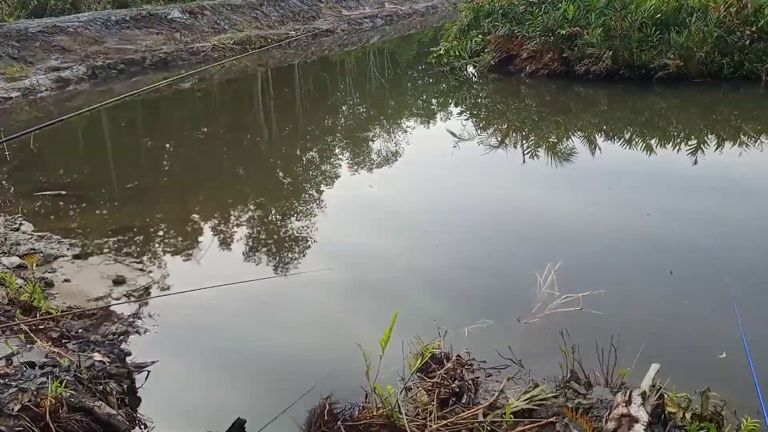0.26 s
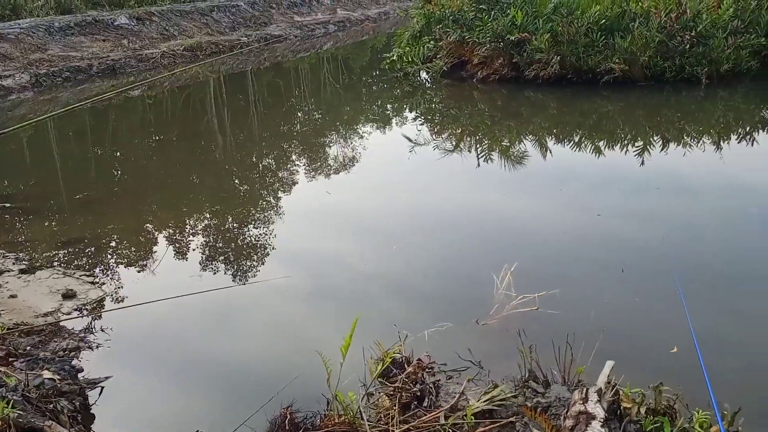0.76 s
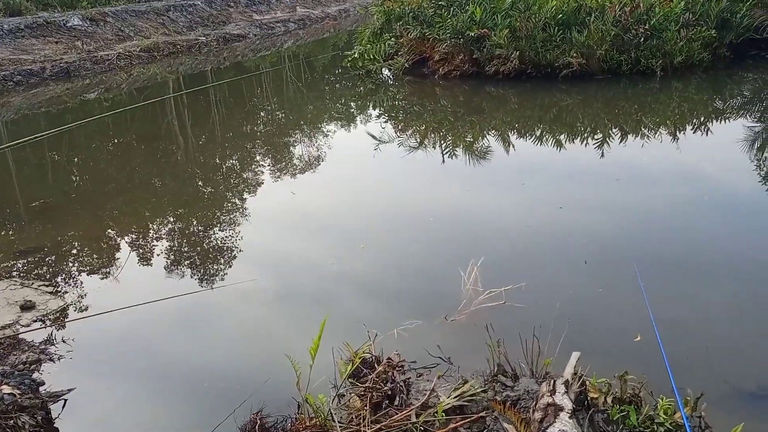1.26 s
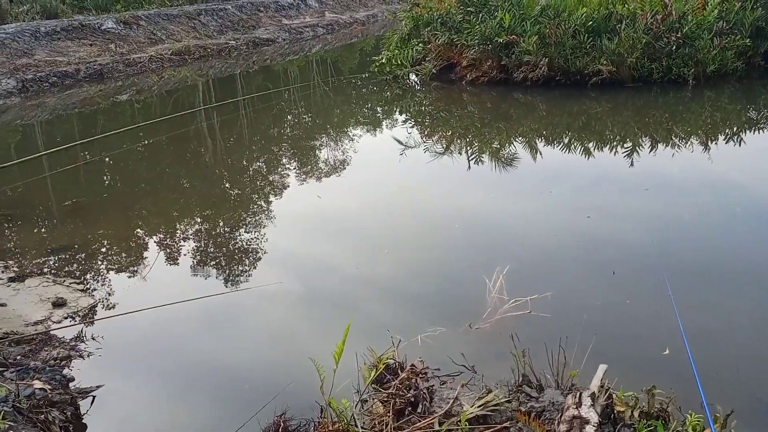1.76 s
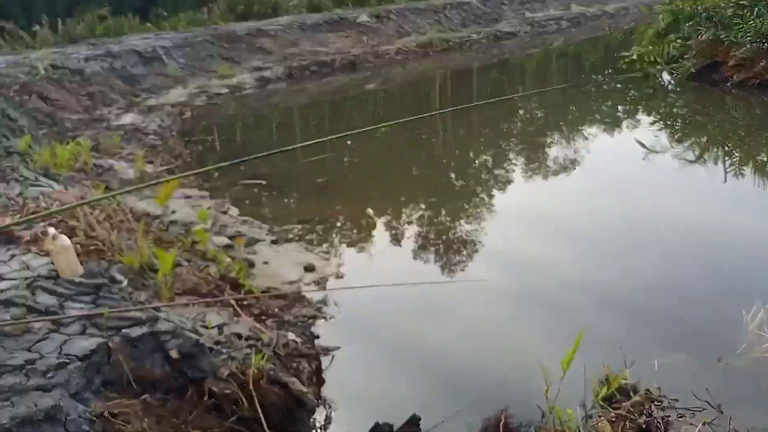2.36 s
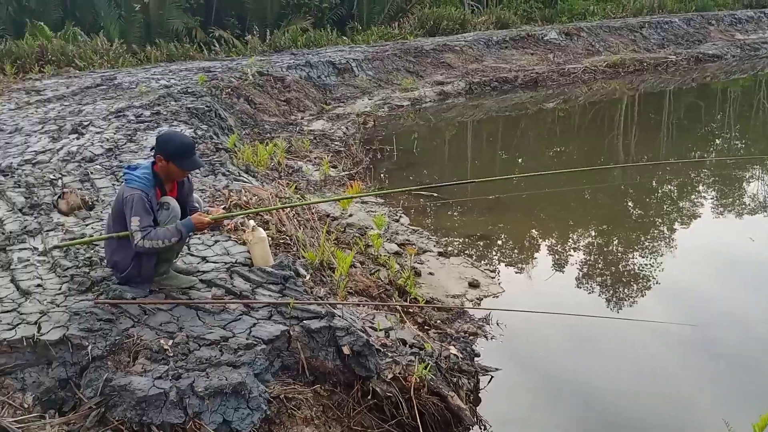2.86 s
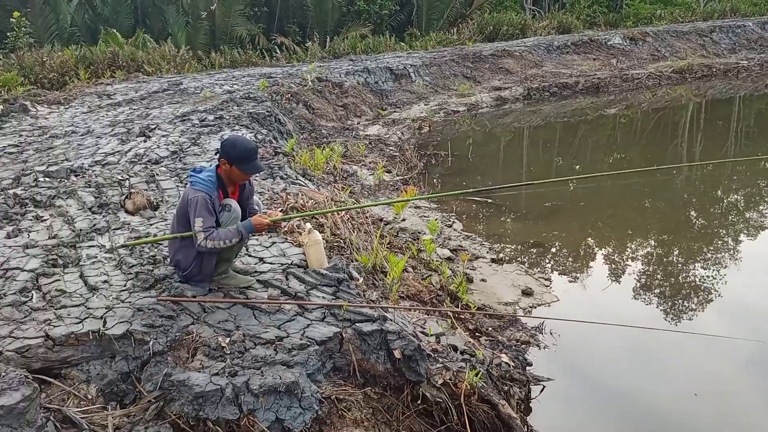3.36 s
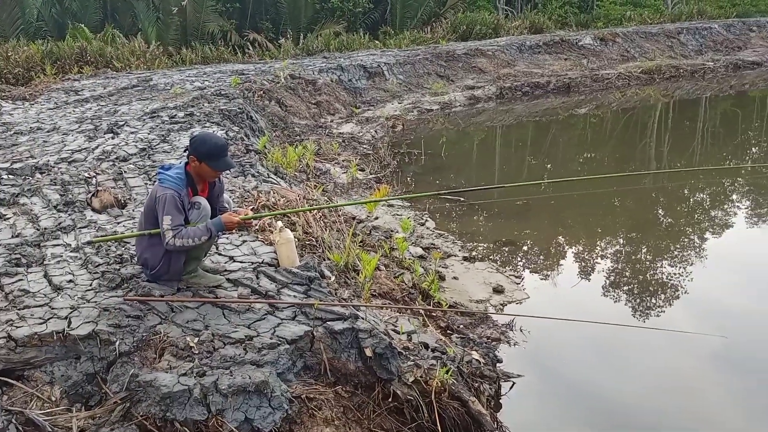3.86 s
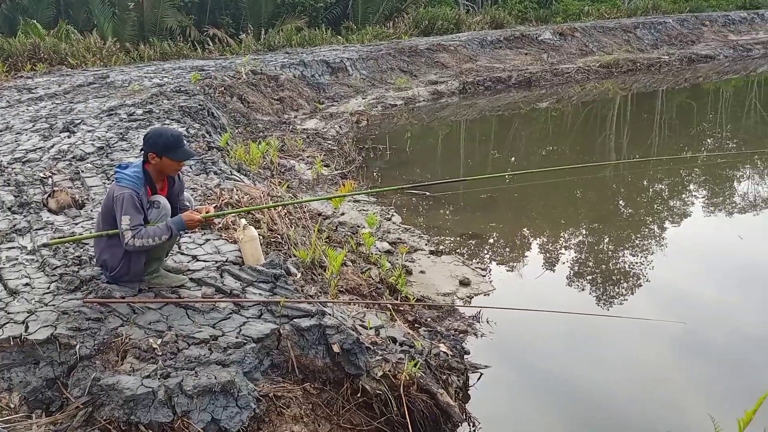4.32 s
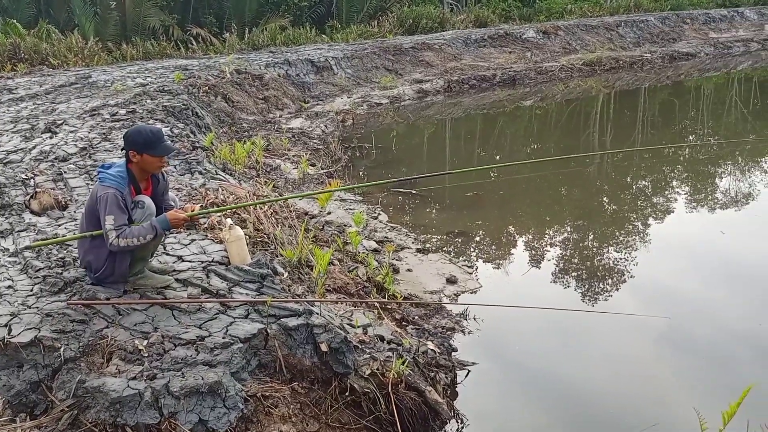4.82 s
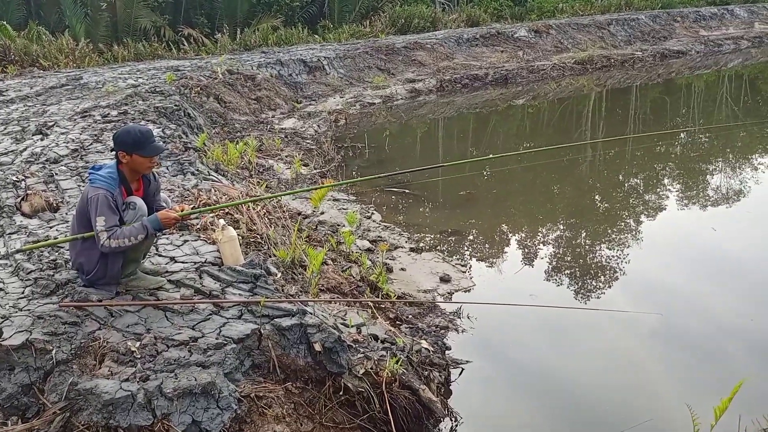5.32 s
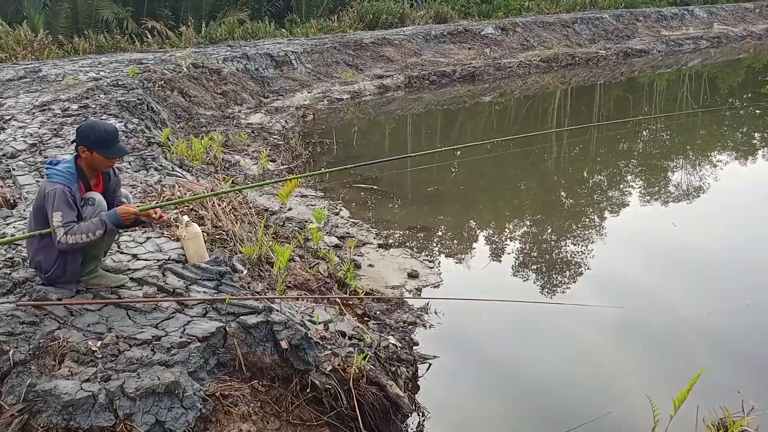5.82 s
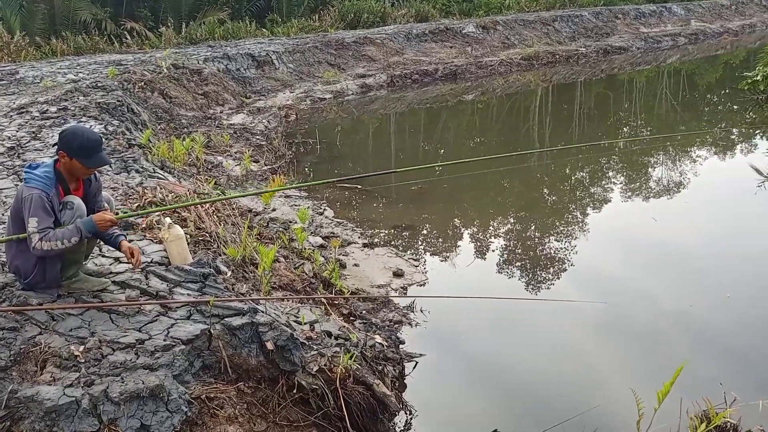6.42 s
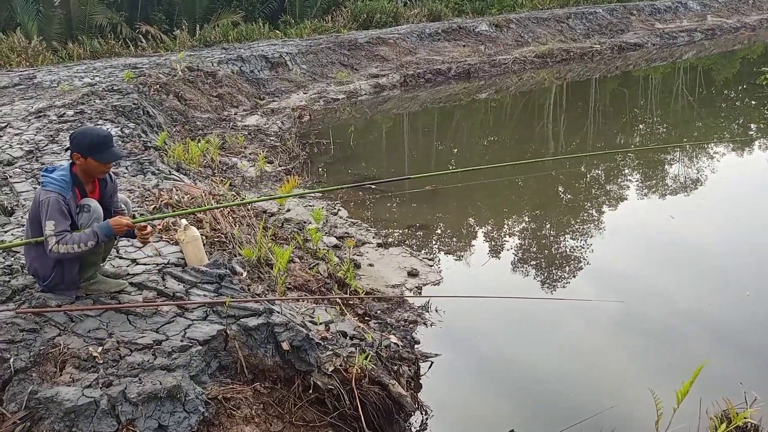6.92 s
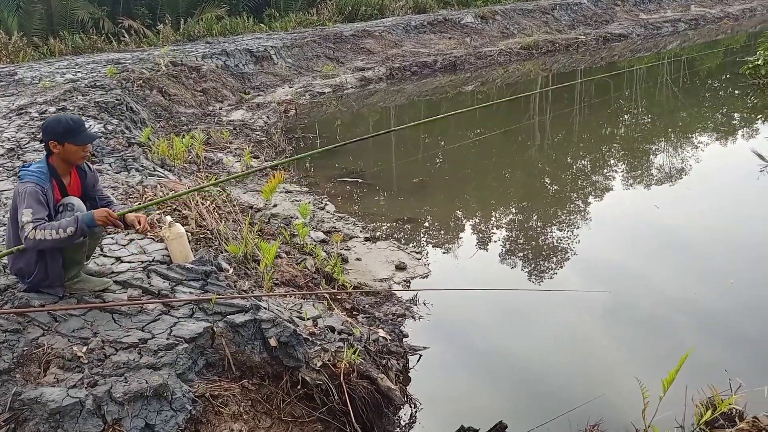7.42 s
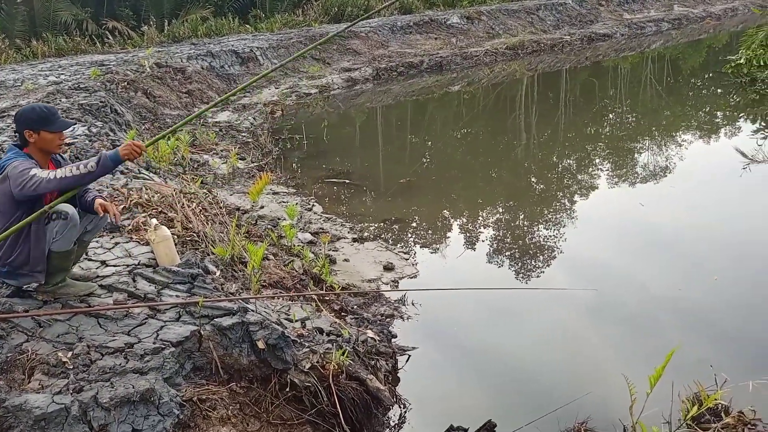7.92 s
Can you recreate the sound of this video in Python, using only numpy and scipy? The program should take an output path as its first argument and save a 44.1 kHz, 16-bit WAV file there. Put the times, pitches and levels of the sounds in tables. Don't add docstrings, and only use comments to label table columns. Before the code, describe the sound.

A calm open-air pond with a low, soft hush. Far crickets make an unbroken trill near 3 kHz, a nearer one buzzes in phrases of roughly half a second to a second, and cicadas ring thinly around 8 kHz, swelling gently. Two dull rod knocks land close at 0.35 and 0.43 s, with a narrow dry tick at 0.6. From 1.1 to 3.8 s a bird chirps about four times a second, each chirp a fast double up-and-down swoop, strongest near 2.5. Firmer thumps cluster at 2.1 and 2.55; faint far whistles bend upward between 2.8 and 3.8, and a bright twig crack comes at 3.5. Insects alone hold from 4 to 5.9 s. The bird then resumes, louder, until the end, lightly echoing. Soft knocks fall at 6.55, a stronger one at 7.15, then a heavy thump at 8.0 and a rapid, muffled flurry to about 8.2.

```python
import sys
import numpy as np
from scipy import signal
from scipy.io import wavfile
from scipy.ndimage import uniform_filter1d

SR = 44100
rng = np.random.default_rng(int(sys.argv[2]) if len(sys.argv) > 2 else 0)


def elevation(decibels):
    levels = np.asarray(decibels, float)
    return 10 ** (levels / 20)


def unload_audio(sound):
    columns = np.transpose(np.atleast_2d(sound))
    steps = np.round(np.clip(columns, -1, 1) * 32767)
    wavfile.write(sys.argv[1], SR, steps.astype(np.int16))


N = 360738


def read(points, hz):
    f, value = np.transpose(points)
    return np.interp(np.log(hz + 1), np.log(f + 1), value)


def evened(x):
    return x / np.sqrt(np.mean(x ** 2) + 1e-20)


def add(mix, s, sound):
    at = round(s * SR)
    sound = sound[max(-at, 0):]
    part = mix[max(at, 0):][:len(sound)]
    part += sound[:len(part)]


def played(source, rows):
    mix = np.zeros(N)
    for row in rows:
        add(mix, *source(*row))
    return mix


def band(x, low_hz, high_hz):
    sos = signal.butter(2, [low_hz, min(high_hz, SR / 2.1)], "band", fs=SR, output="sos")
    return signal.sosfilt(sos, x)


def wander(size, span_s):
    width = max(int(span_s * SR), 1)
    smooth = uniform_filter1d(rng.standard_normal(size), width)
    return evened(uniform_filter1d(smooth, width))


# time_s, level_db
CHORUS_LEVEL = [(0.0, -60.5), (1.02, -63.5), (1.75, -62.5), (2.14, -57), (3.6, -62), (3.71, -60.5),
                (4.49, -64.5), (5.15, -65), (5.65, -63), (5.92, -62), (6.06, -60.5), (7.11, -60.5),
                (8.02, -59), (8.18, -56.5)]
QUIET_DB = -64


def bed(rest_db, share):
    s, db = np.transpose(CHORUS_LEVEL)
    chorus_db = np.interp(np.arange(N) / SR, s, db)
    return elevation(rest_db + share * (chorus_db - QUIET_DB))


# freq_hz, density_db (per Hz)
HUSH_COLOUR = [(25, -50), (45, -17), (62, -2), (130, -.1), (300, -4), (700, -9), (1500, -12), (2300, -13),
               (3000, -9), (3600, -16), (4500, -24), (7000, -29), (10000, -37), (13000, -39), (16000, -40)]


def hush():
    frames, hz = N // 256 + 5, np.fft.rfftfreq(1024, 1 / SR)
    real, imag, patches = rng.standard_normal((frames, 513, 3)).T
    patches = uniform_filter1d(uniform_filter1d(patches, 10, 0), 12, 1)
    level_db = read(HUSH_COLOUR, hz)[:, None] + 1.6 * evened(patches)
    spectra = (real + 1j * imag) * elevation(level_db)
    air = signal.istft(spectra, nperseg=1024, noverlap=768)[1][:N]
    return bed(-70, share=0.79) * air / np.std(band(air, 325, 1490))


def stridulate(length, first_hz, last_hz, wing_db, beat_hz, beat, waver_hz):
    t = np.arange(int(length * SR)) / SR
    glide_hz = first_hz + (last_hz - first_hz) * (t / length) ** .8
    hz = glide_hz + waver_hz * wander(len(t), 0.00857)
    turn = 2 * np.pi * (np.cumsum(hz) / SR + rng.random())
    tone = sum(elevation(db) * np.cos((k + 1) * turn) for k, db in enumerate(wing_db))
    strokes = 1 + beat * np.cos(2 * np.pi * (beat_hz * t + rng.random()))
    unsteady = elevation(3.3 * wander(len(t), 0.026))
    return tone * strokes * unsteady * signal.windows.tukey(len(t), .45)


# start_s, length_s, first_hz, last_hz, level_db
PHRASES = [(-.2, 0.97, 3045, 3080, -77.5), (1.072, 0.62, 3040, 3030, -81), (2.258, 0.7, 3040, 2960, -69),
           (3.515, 0.72, 3094, 3004, -73), (4.722, 0.8, 3045, 2940, -78), (5.954, 0.71, 3085, 2924, -70),
           (7.193, 0.72, 3066, 2994, -70), (0.249, 0.33, 3000, 2910, -74), (1.603, 0.33, 3000, 2895, -104),
           (2.905, 0.89, 2910, 2890, -85), (4.13, 0.59, 2880, 2760, -103), (5.3, 0.53, 2924, 2950, -77),
           (6.655, 0.57, 2920, 2930, -79.5)]
NEAR_WING_DB = [-.1, -3, -5, -10, -24]
FAR_WING_DB = [-.1, -20, -24, -17, -28]


def crickets():
    near, far = np.zeros((2, N))
    for s, length, first_hz, last_hz, db in PHRASES:
        phrase = stridulate(length, first_hz, last_hz, NEAR_WING_DB, beat_hz=324, beat=0.65, waver_hz=4.7)
        add(near, s, elevation(db) * phrase)
    for k, (place, size, beat) in enumerate(rng.random((100, 3))):
        hz = 2870 + 250 * (k * .618 % 1)
        purity = np.clip((hz - 2990) / 60, 0, 1)
        wing_db = FAR_WING_DB - 4.1 * np.arange(5) * purity
        phrase = stridulate(.7, hz, hz - 25, wing_db, beat_hz=40 + 60 * beat, beat=0.53, waver_hz=15.95)
        start_s = -.7 + (k + place) / 100 * (N / SR + .7)
        level_db = -4 * size - 2.1 * ((hz - 2970) / 150) ** 2
        add(far, start_s, elevation(level_db) * phrase)
    far /= np.sqrt(uniform_filter1d(far ** 2, SR // 3))
    return near + bed(QUIET_DB + 1, share=0.84) * far


# time_s, lift_db (above rest)
SURGES = [
    (.5, 6.5),
    (1.48, 3),
    (2.761, 5),
    (3.7, 3.5),
    (4.9, 1),
    (6.28, 5.5),
    (7.4, 6),
    (8.25, 5),
]


def surges():
    t = np.arange(N) / SR
    return elevation(sum(db * np.exp(-((t - s) / 0.3) ** 2) for s, db in SURGES))


# freq_hz, width_hz, level_db
CICADA_MODES = [(8320, 260, -.1), (8800, 250, -8), (7750, 200, -10), (7100, 250, -15), (8400, 900, -1)]


def cicadas():
    clicks = (rng.random(N) < 6000 / SR) * rng.standard_normal(N)
    rings = np.zeros(N)
    for hz, width, db in CICADA_MODES:
        broad = band(clicks, hz - width, hz + width)
        rings += elevation(db) * evened(band(broad, hz - width / 2, hz + width / 2))
    shimmer = elevation(.8 * wander(N, .03))
    return bed(-72.5, share=0.27) * surges() * evened(rings) * shimmer


# swing_s (main swing), peak_db, sweep_hz, decay_ms, sharpness (0-1)
KNOCKS = [(0.3525, -26.5, 135, 8.8, 0.43), (0.4336, -28.5, 125, 11, 0.55), (1.0866, -55, 86.5, 17, 0),
          (1.3483, -45.5, 140, 4.8, .3), (1.6072, -49.5, 161, 9.5, .2), (2.0606, -27.5, 226, 10, 1),
          (2.1053, -32, 211, 21, 0.6), (2.198, -29, 220, 19, 1), (2.5311, -45, 206, 15, .1),
          (2.5429, -29.5, 210, 22, 0.12), (2.573, -28, 212, 12, 0.64), (6.547, -39, 91.5, 2.5, 0),
          (6.5623, -39, 121, 4.2, 0.3), (7.1467, -24, 118.5, 8.1, 0.49), (7.3564, -48, 289, 35, 0.3),
          (7.7133, -49, 81, 5.4, .03), (7.986, -20, 121, 7.6, 0.53), (8.023, -32.5, 111, 19, 0.4),
          (8.0538, -32.5, 115, 16, 0.38), (8.0803, -33, 124, 12, 0.47), (8.1148, -32.5, 113, 24, .25),
          (8.1439, -32, 113, 15, 0.42), (8.1783, -30, 118, 20, 0.4)]


def knock(s, db, sweep_hz, decay_ms, sharp):
    t = np.arange(-300, 2000) / SR
    turns = 95 * t + sweep_hz * 0.0022 * (1 - np.exp(-t / 0.002344))
    edge_s = .00014 + .00041 * max(1 - sharp, 0) ** 3
    lead_s = 0.389 / sweep_hz
    start = (t + lead_s) / edge_s
    fade = np.exp(-np.maximum(t, 0) * 1000 / decay_ms - (t / 0.021) ** 4)
    thump = np.cos(2 * np.pi * turns) * fade / (1 + np.exp(-start))
    snap = sharp * (start + 0.35) * np.exp(-(start + 1.38) ** 2 / 1.8)
    return s + t[0], elevation(db) * (thump - snap)


# start_s, level_db, low_hz, high_hz, decay_ms
TICKS = [
    (0.596, -44.5, 3900, 4760, 3.3),
    (1.83, -75, 9000, 15000, 3.0),
    (3.494, -45.5, 3200, 14500, 4),
    (3.695, -68, 3550, 15400, 4.0),
]


def tick(s, db, low_hz, high_hz, decay_ms):
    t = np.arange(2000) / SR
    burst = rng.standard_normal(2000) * np.exp(-t * 1000 / decay_ms)
    return s, elevation(db) * band(burst, low_hz, high_hz)


CREST_S, HELD_S = .0135, .0122


def arch(since):
    climb = (abs(since) / .0165) ** 1.55
    drop = (abs(since) / .022) ** 1.8
    bow = 1 - np.where(since < 0, climb, drop)
    return bow * np.clip(1 - (since - HELD_S) / .003, 0, 1)


# start_s, first_db, pitch_factor, gap_ms (between arches), second_db
CHIRPS = [(1.066, -55, 1.02, 34.7, -47), (1.2818, -52, 1.01, 37, -46), (1.5222, -52, 1.003, 30, -44.5),
          (1.767, -48, 0.98, 34.4, -44), (1.997, -47.5, 0.99, 37, -43), (2.237, -48, 0.96, 33.3, -43),
          (2.4938, -45, 0.97, 34.5, -39.5), (2.7436, -44, 0.99, 35, -41), (2.991, -47, 1.03, 37, -44.5),
          (3.245, -54, 1.03, 37, -49.5), (3.4933, -53.5, 0.99, 46, -54.5), (3.7675, -51.5, 0.99, 38, -49),
          (5.9124, -46, 1.093, 33.4, -41.5), (6.085, -44, 0.99, 34, -40), (6.3186, -43, 0.984, 35.4, -39),
          (6.524, -41.5, 1.006, 33.3, -41), (6.7673, -44, 1, 35.5, -42.5), (7.018, -44.5, 0.99, 34.4, -42),
          (7.2544, -43.5, 0.99, 31.6, -42.5), (7.503, -44, 1, 35, -41.5), (7.7668, -42, 1.005, 33, -40),
          (8.0335, -40.5, 0.99, 33, -40.5)]
# freq_hz, level_db
THROAT = [(1200, -40), (1850, -30), (2200, -10), (2580, -.1), (2900, -7), (3400, -19), (4200, -18),
          (4550, -38), (6000, -44)]


def chirp(s, first_db, pitch, gap_ms, second_db):
    gap, lead_in_s, die_out_s = gap_ms / 1000, .014, .016
    valley_hz, crest_hz, second_lift = 1500, 2790, 1.07
    t = np.arange(-lead_in_s, gap + CREST_S + HELD_S + die_out_s, 1 / SR)
    first, second = arch(t - CREST_S), arch(t - CREST_S - gap)
    later = second > first
    height = np.clip(np.maximum(first, second), 0, 1)
    top_hz = crest_hz * np.where(later, second_lift, 1)
    hz = pitch * uniform_filter1d(valley_hz + (top_hz - valley_hz) * height, 60)
    hoarse = np.clip((2200 * pitch - hz) / 300, 0, 1)
    jitter = 0.0068 * wander(len(t), 0.0036) + 0.103 * hoarse * wander(len(t), 0.00072)
    turn = 2 * np.pi * np.cumsum(hz * (1 + jitter)) / SR
    voice = np.zeros(len(t))
    for k, db in enumerate([-12 * hoarse, -6, -12]):
        throat_db = read(THROAT, (k + 1) * hz / pitch)
        voice += elevation(db + throat_db) * np.cos((k + 1) * turn)
    since = t - CREST_S - gap * later
    push_db = 204 * since * height + 2.5 * (1 - height)
    sag_db = -2.5 * np.exp(-(since / .0037) ** 2)
    level_db = push_db + sag_db + np.where(later, second_db, first_db)
    flutter_db = 2.5 * wander(len(t), .002)
    ends = np.clip(np.minimum((t - t[0]) / lead_in_s, (t[-1] - t) / die_out_s), 0, 1)
    return s + t[0], ends * elevation(7 + uniform_filter1d(level_db, 40) + flutter_db) * voice


# start_s, length_s, first_hz, last_hz, level_db
WHISTLES = [
    (2.756, 0.016, 1810, 1820, -61),
    (2.82, 0.079, 1700, 1940, -67.5),
    (3.283, 0.027, 2140, 2180, -53.5),
    (3.617, 0.22, 1884, 1950, -69.5),
]


def whistle(s, length, first_hz, last_hz, db):
    u = np.arange(int(length * SR)) / (length * SR)
    hz = first_hz + (last_hz - first_hz) * np.sin(2.0 * u)
    turn = 2 * np.pi * np.cumsum(hz) / SR
    level_db = db + 7.3 * u + 3.0 * wander(len(u), .004)
    return s, elevation(level_db) * np.sin(turn) * signal.windows.tukey(len(u), .4)


def banks(x, t60, late_t60, late_db):
    t = np.arange(SR) / SR
    taps = (rng.random(SR) < 1500 / SR) * rng.standard_normal(SR) * np.clip(t / 0.009, 0, 1)
    tail = taps * (elevation(-60 * t / t60) + elevation(late_db - 60 * t / late_t60))
    return signal.fftconvolve(x, tail / np.linalg.norm(tail))[:N]


def scene():
    gear = played(knock, KNOCKS) + played(tick, TICKS)
    gear = gear + elevation(-17) * banks(gear, t60=0.055, late_t60=0.54, late_db=-27)
    chirps, whistles = played(chirp, CHIRPS), played(whistle, WHISTLES)
    s, second_db = np.transpose(CHIRPS)[[0, 4]]
    sung_db = np.interp(np.arange(N) / SR, s + 0.041, second_db)
    turned_db = np.clip(-41.5 - sung_db, 0, 12)
    sent = chirps * elevation(-7 + .7 * turned_db) + elevation(-12) * whistles
    echoes = banks(sent, t60=0.13, late_t60=2.4, late_db=-20.5)
    birds = chirps * elevation(-.6 * turned_db) + whistles + echoes
    return (hush() + crickets() + cicadas() + gear + birds)[None]


def top_cut(x):
    return signal.sosfilt(signal.butter(12, 15500, fs=SR, output="sos"), x)


def record(dry):
    mix = signal.sosfilt(signal.butter(2, 32, "high", fs=SR, output="sos"), dry)
    return top_cut(mix)


dry = scene()
out = record(dry)
unload_audio(out)
```